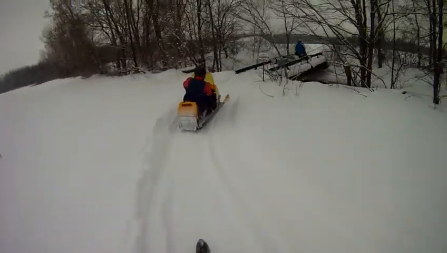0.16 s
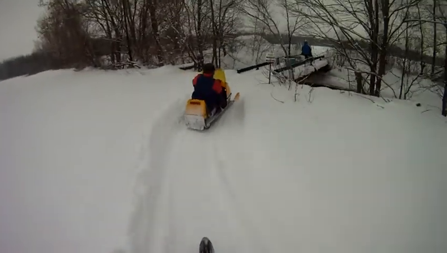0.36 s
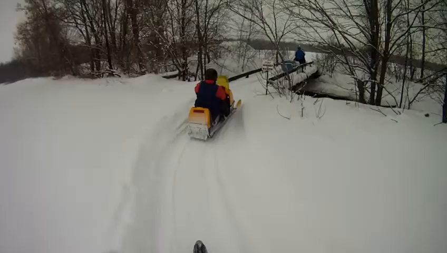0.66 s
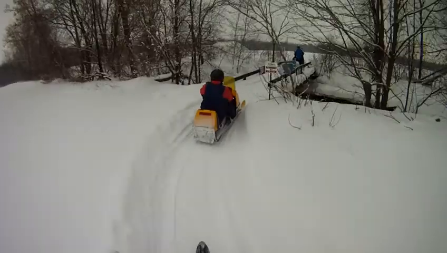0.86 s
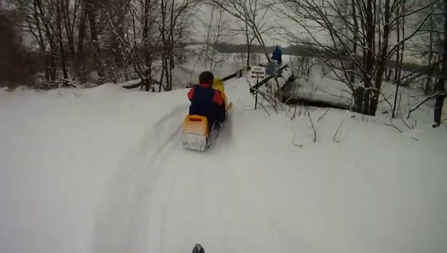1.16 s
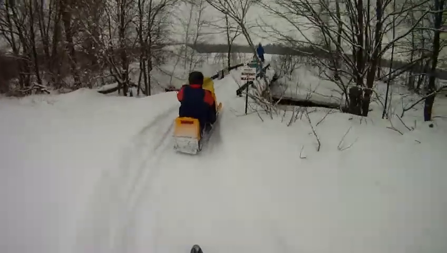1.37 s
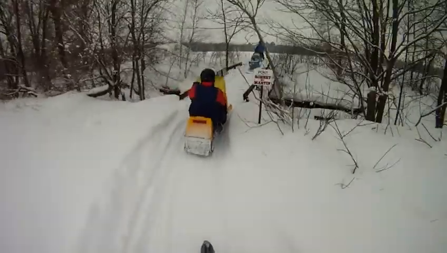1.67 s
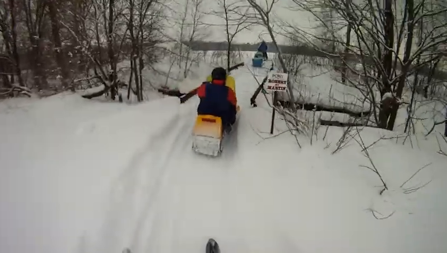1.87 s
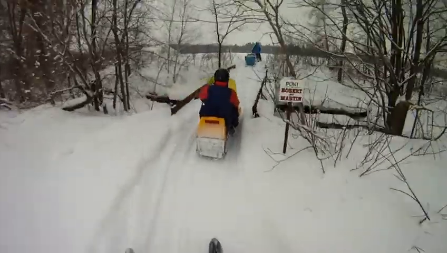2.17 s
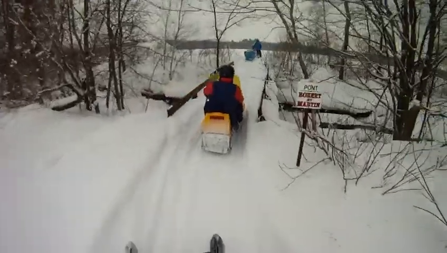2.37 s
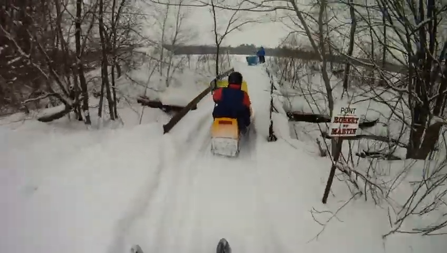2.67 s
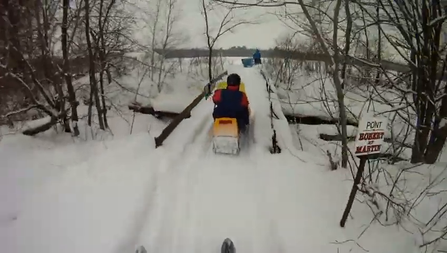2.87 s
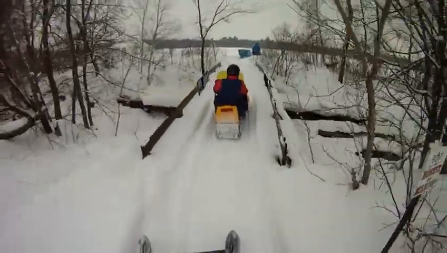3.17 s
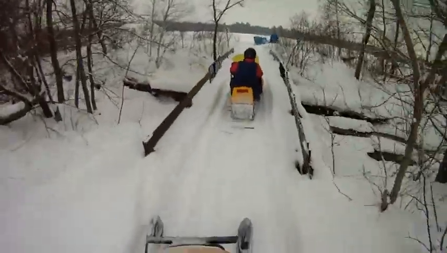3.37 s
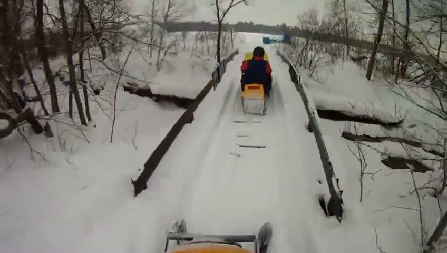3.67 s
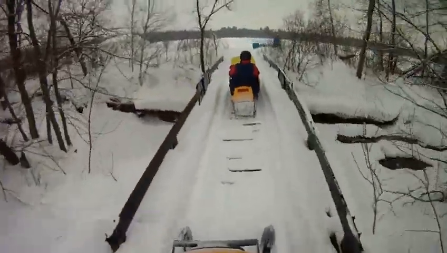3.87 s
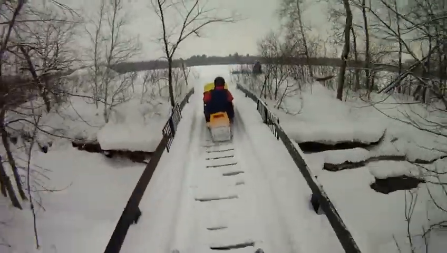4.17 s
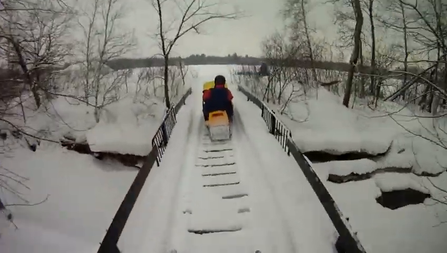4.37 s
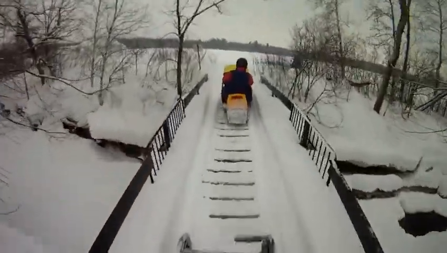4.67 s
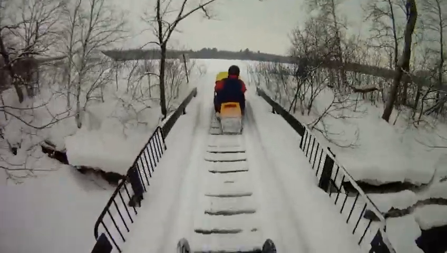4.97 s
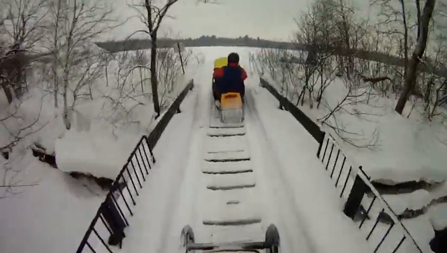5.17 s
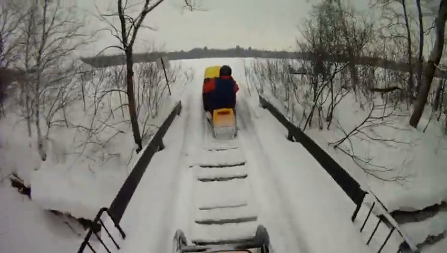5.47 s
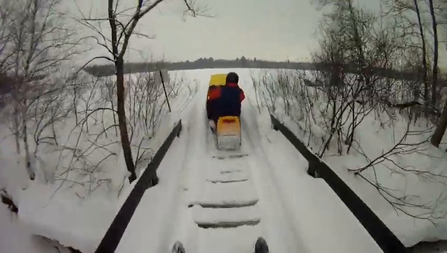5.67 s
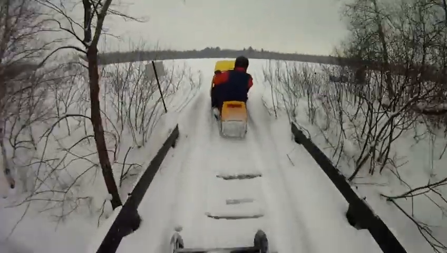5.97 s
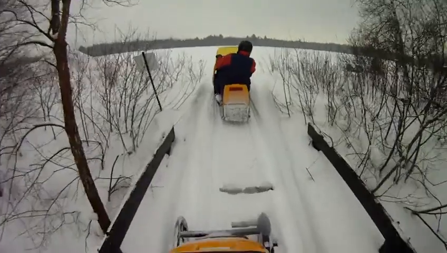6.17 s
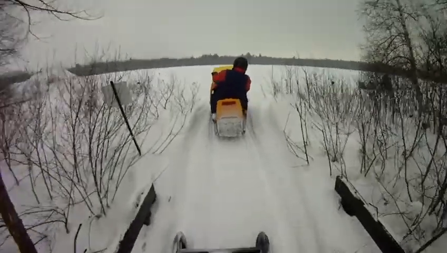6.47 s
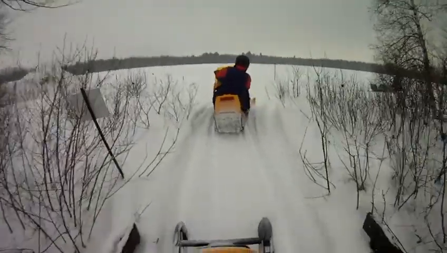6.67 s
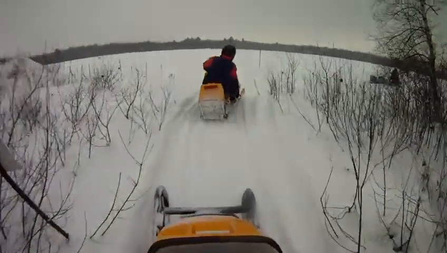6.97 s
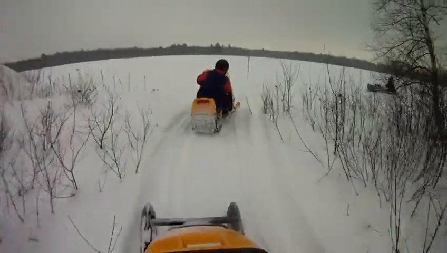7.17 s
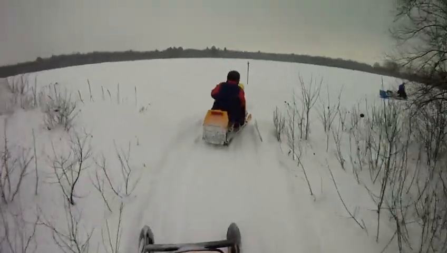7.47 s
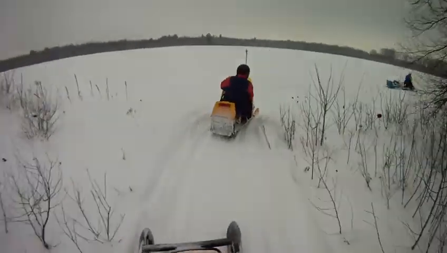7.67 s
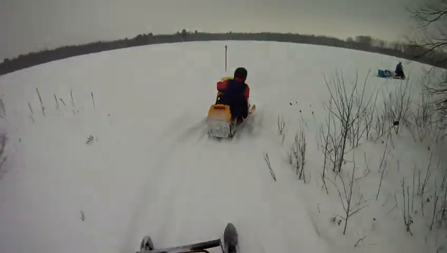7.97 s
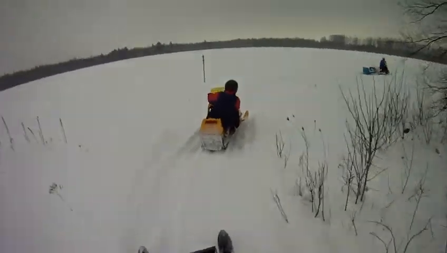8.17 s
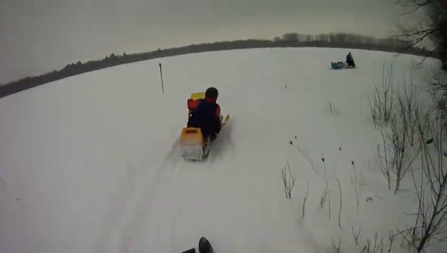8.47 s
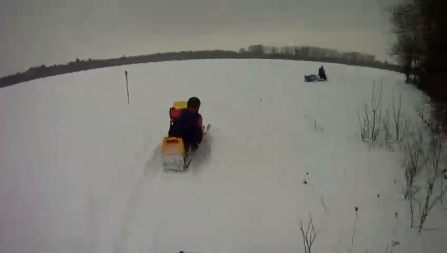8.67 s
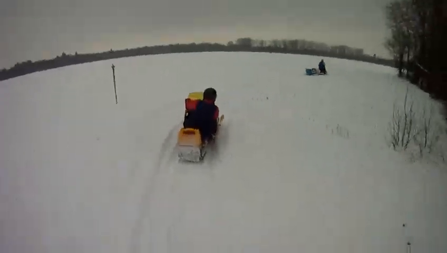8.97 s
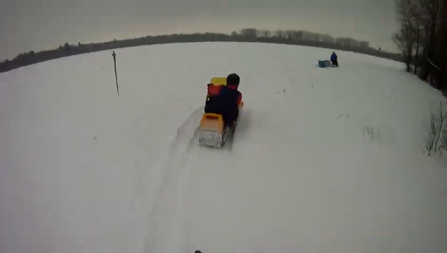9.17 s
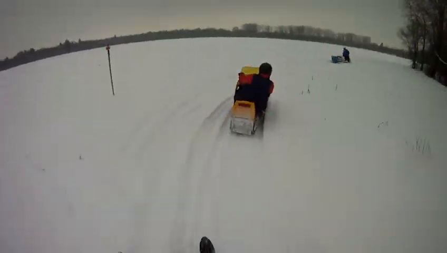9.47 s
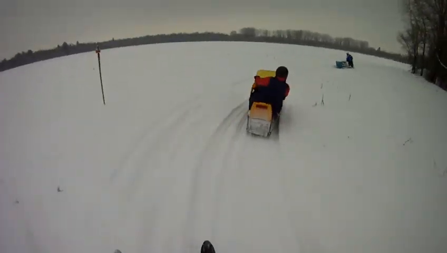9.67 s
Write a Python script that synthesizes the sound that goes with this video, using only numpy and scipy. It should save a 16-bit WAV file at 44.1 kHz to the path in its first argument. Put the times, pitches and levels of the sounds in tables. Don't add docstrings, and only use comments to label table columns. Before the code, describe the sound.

A sealed, dull-sounding microphone rides on a one-cylinder snowmobile. Low exhaust puffs skip and pop, each loud thump making the rest dip for a moment. Throttle bursts smooth the firing into a droning growl with a nasal intake ring. The engine falls back to sputtering near the end, revs and settles into regular popping, over track rattle and low rumble, nearly mono and gritty.

```python
import sys
import numpy as np
from scipy import signal
from scipy.fft import rfft, irfft
from scipy.io import wavfile
from scipy.ndimage import uniform_filter1d

SR = 44100
rng = np.random.default_rng(int(sys.argv[2]) if len(sys.argv) > 2 else 0)


def to_wav(s):
    ch = np.atleast_2d(s).T
    pcm = np.round(np.clip(ch, -1, 1) * 32767)
    wavfile.write(sys.argv[1], SR, pcm.astype(np.int16))


def invert_db(x):
    u = np.asarray(x, float) / 20
    return 10 ** u


N = 433052
START_HZ = 55
IN_STEP = .95

# (frequency [Hz], density [dB per Hz])
EXHAUST = [(12, -79), (20, -73), (40, -12.5), (80, -10), (113, -1.5), (176, -1), (237, -6), (368, -20.5),
           (471, -21), (520, -23.5), (698, -29), (822, -26), (952, -26), (1000, -30), (1300, -87),
           (2200, -120)]
# (frequency [Hz], density [dB per Hz])
COWL = [(560, -41), (950, -2.5), (1000, -3), (1120, 6.5), (1180, 7), (1390, 6), (1520, -3.5), (1660, -3),
        (1920, -10.5), (2240, -10.5), (2510, -22.5), (3340, -17.5), (4180, -32.5), (5100, -16),
        (6000, -21.5), (7800, -67), (13200, -120)]
# (frequency [Hz], width [Hz], level [dB])
AIR_BOX = [(587, 84, -11), (817, 108, -6.5), (1167.4, 57, 4), (1408, 69, -10), (1728, 13, -5.5),
           (2224, 11.4, -9)]


def in_time(rows):
    s, *columns = np.transpose(rows)
    return [np.interp(np.arange(N) / SR, s, c) for c in columns]


def rms_one(x):
    return x / np.sqrt(np.mean(x ** 2) + 1e-20)


def colour(x, spectrum, smear_s=0.):
    hz = np.maximum(np.fft.rfftfreq(N, 1 / SR), 1)
    corner_hz, db = np.transpose(spectrum)
    lag = np.exp(-1j * np.pi * smear_s * hz ** 2 / 1000)
    gain = invert_db(np.interp(np.log(hz), np.log(corner_hz), db))
    return rms_one(irfft(rfft(x) * lag * gain, N))


def band(x, low_hz, high_hz):
    return rms_one(signal.sosfilt(signal.butter(3, [low_hz, high_hz], "band", fs=SR, output="sos"), x))


def ring(x, modes):
    out = 0
    for k, (hz, width_hz, db) in enumerate(modes):
        r = np.exp(-np.pi * width_hz / SR)
        poles = [1, -2 * r * np.cos(2 * np.pi * hz / SR), r * r]
        zeros = np.array([1, 0, -1]) * (1 - r * r) / 2
        out = out + (-1) ** k * invert_db(db) * signal.lfilter(zeros, poles, x + 1e-18)
    return rms_one(out)


def drift(rate_hz):
    r = np.exp(-80 * np.pi * rate_hz / SR)
    slow = signal.lfilter([1], [1, -2 * r, r * r], rng.standard_normal(N // 40 + 2002))[2000:]
    return np.interp(np.arange(N) / 40, np.arange(len(slow)), rms_one(slow))


def clicks(at_s, sizes):
    out = np.zeros(N)
    np.add.at(out, np.clip(np.round(at_s * SR).astype(int), 0, N - 1), sizes)
    return out


def new_turns(turns):
    return np.flatnonzero(np.diff(np.floor(turns)))


def gated_hiss(turns, delay, sharp):
    gate = np.exp(-sharp * ((turns - delay) % 1))
    return rng.standard_normal(N) * uniform_filter1d(gate, size=60)


def engine_state():
    # (time [s], pull towards crank speed [Hz], load [0-1], every-second-turn steadiness [0-1])
    throttle = [(0, 44.9, .35, .3), (.24, 63.3, .4, .3), (.46, 44.6, .3, .4), (.72, 46.6, .28, .4),
                (1.2, 40.2, .26, .4), (1.97, 36.3, .45, .5), (2.38, 49.8, .3, .5), (2.6, 45.2, .3, .5),
                (2.87, 34.6, .3, .5), (3.03, 55.3, .3, .5), (3.22, 63.2, .9, .6), (3.7, 51.8, .9, .8),
                (3.92, 42.5, .4, .85), (4.21, 53.6, .4, 1), (4.72, 38.5, .3, .5), (4.85, 66.4, .5, .4),
                (4.97, 66.7, .9, .4), (5.27, 43, .25, .5), (5.8, 58.1, .35, .5), (5.97, 51, .58, .5),
                (6.54, 66.8, .95, .5), (6.95, 59, .95, .5), (8, 64, .95, .5), (8.4, 48.4, .27, .5),
                (8.9, 68.3, .88, .8), (9.24, 55.6, .55, .9), (9.33, 60.2, .4, 1), (9.66, 53.2, .47, .8)]
    flywheel_s, thumb_s = .4, .08
    s, *columns = np.transpose(throttle)
    move = np.searchsorted(s, np.arange(N) / SR, "right") - 1
    pull_hz, load, steady = [uniform_filter1d(c[move], size=int(thumb_s * SR)) for c in columns]
    r = np.exp(-1 / (flywheel_s * SR))
    return signal.lfilter([1 - r], [1, -r], pull_hz, zi=[START_HZ])[0], load, steady


def trail_roughness_db():
    # (time [s], level [dB])
    trail = [(0, 3), (.38, 4), (.5, 1.2), (1.2, 1.5), (1.6, -0.5), (2.3, -0.5), (3, .2), (3.6, -1.6),
             (4.1, 3), (5, 0.9), (5.5, 1.2), (6.4, 0), (6.7, 1.7), (7.9, -2.3), (8.6, 4.5), (9, -0.6),
             (9.46, 3.5), (9.82, 1.6)]
    return in_time(trail)[0]


def lead_sled():
    turns = np.cumsum(74 + 3.0 * drift(.4)) / SR
    at = new_turns(turns)
    luck = rng.standard_normal((1000, 2))[:len(at)]
    return colour(clicks(at / SR + 0.00055 * luck[:, 0], invert_db(1.0 * luck[:, 1])), EXHAUST)


def trail_rumble():
    return colour(rng.standard_normal(N) * invert_db(0.5 * drift(23)), EXHAUST)


def track_rattle(turns):
    loose = rng.standard_normal(N) * invert_db(0.91 * drift(19) + 1.6 * drift(30))
    return loose + 1.1 * gated_hiss(turns, 0.633, sharp=1.95)


def snow_spray(rattle, trail_db):
    return invert_db(-68 + 1.8 * trail_db) * band(rattle, 4370, 5680)


def panel_clatter(rattle, octaves, trail_db):
    level_db = -41.5 + 2 * octaves + trail_db
    return invert_db(level_db) * (band(colour(rattle, COWL), 1827, 4650) + invert_db(-10.5) * ring(rattle, AIR_BOX[4:]))


def chassis_shake(turns, octaves, load, trail_db):
    level_db = -29.5 - 18 * load + 0.77 * trail_db - 6.4 * octaves + 5.5 * np.minimum(drift(11.0), .4)
    return invert_db(level_db) * np.sqrt(2) * np.cos(2 * np.pi * turns)


def intake(turns, load):
    port = clicks(new_turns(turns - .3) / SR, 1)
    port = rms_one(port) * (.6 + .4 * load) * invert_db(1.0 * drift(20))
    gulp = band(colour(gated_hiss(turns, 0.27, sharp=1.2), COWL), 750, 2060)
    notch = signal.iirnotch(985, 4.0, fs=SR)
    rung = signal.lfilter(*notch, signal.lfilter(*notch, ring(port, AIR_BOX)))
    return rms_one(rung) + invert_db(-9) * gulp


def rich_firings(turns, load, steady):
    # (time [s], peak [dB], depth of the gain duck that follows [dB])
    big_pops = [(0.182, -3.1, 8.3), (0.395, -3.9, 5.2), (0.638, -4.6, 5.9), (0.898, -4.9, 5.6),
                (1.021, -3.4, 3.2), (1.234, -2.9, 4.4), (1.344, -2.0, 11.4), (1.546, -3.1, 6.4),
                (1.687, -2.3, 8), (1.855, -4.1, 6.6), (2.092, -4.9, 10.3), (2.594, -4.1, 6.3),
                (2.711, -3.7, 6.5), (3.03, -2.8, 4.9), (3.317, -3.8, 3.4), (4.269, -4.8, 5),
                (4.487, -4.1, 4.5), (4.64, -3.9, 6.5), (4.791, -3.1, 7.8), (4.869, -3.8, 1.4),
                (5.332, -1.1, 8), (5.553, -0.4, 12.6), (5.836, -1.0, 11.2), (6.275, -2.8, 4.2),
                (6.494, -4.0, 3.1), (8.448, -4.7, 6.5), (8.704, -4.0, 4), (8.882, -2.7, 5.7),
                (9.319, -3.3, 6.5), (9.674, -4.5, 2.9)]
    share, peak_db, rest_s, most_duck_db = .4, -5.8, .035, 3.
    s, db, pop_duck_db = np.transpose(big_pops)
    at = new_turns(turns)
    luck = rng.random((700, 2))[:len(at)]
    clear = np.abs(at[:, None] / SR - s).min(axis=1) > rest_s
    small = clear & (luck[:, 0] < share * (1 - load[at]) * (1 - steady[at]))
    small |= clear & (steady[at] >= IN_STEP) & (np.arange(len(at)) % 2 == 0)
    rich = luck[small, 1]
    pop_s = np.r_[s, at[small] / SR]
    pop_db = np.r_[db, peak_db + 1.6 * (rich - .5)]
    return pop_s, pop_db, np.r_[pop_duck_db, most_duck_db * rich ** 2]


def pops(s, db):
    u = np.pi * 165 * (np.arange(-700, 701) / SR)
    puff = (1 - 2 * u ** 2) * np.exp(-u ** 2) - .08 * np.exp(-(u / 3.0) ** 2)
    return signal.fftconvolve(clicks(s + .002, invert_db(db - .6)), puff, "same")


def hush(s):
    return np.clip(1 - 0.91 * np.convolve(clicks(s + 0.0015, 0.63), np.hanning(700), "same"), 0, 1)


def firings(turns, load, steady):
    at = new_turns(turns)
    luck = rng.standard_normal((700, 3))[:len(at)]
    lean = 1 - load[at]
    slips = np.cumsum(luck[:, 0] > 3.0 * steady[at] - .6)
    weak_turn = (np.arange(len(at)) + slips * (steady[at] < IN_STEP)) % 2
    scatter_db = (1.2 + 3.0 * lean) * np.clip(luck[:, 1], -2, 1.3)
    sizes = np.clip(1 - 1.3 * lean * weak_turn, .1, 1) * invert_db(scatter_db)
    jitter_s = (.0001 + 0.0028 * lean * (1.1 - steady[at])) * luck[:, 2]
    return clicks(at / SR + jitter_s, sizes)


def even_orders(turns, speed, load):
    # (multiple of crank speed [-], level [dB])
    orders = [(1, -6.5), (2, 3), (3, -4), (4, -4.5), (5, -12.5), (6, -16), (7, -14), (8, -17), (9, -54),
              (10, -15), (11, -57)]
    pull = np.clip(uniform_filter1d(np.gradient(speed) * SR, size=4000) / 22, 0, 1)
    lines = 0
    for (k, db), p in zip(orders, rng.random(len(orders))):
        line_db = db + 3.06 * drift(18.0) + 8.2 * pull * (4 < k < 10)
        lines = lines + invert_db(line_db) * np.cos(2 * np.pi * k * turns - .2 * k * (1 + p))
    return rms_one(lines) * load ** 2.5


def exhaust(turns, speed, load, steady, rumble):
    fired = colour(firings(turns, load, steady), EXHAUST, smear_s=.003)
    fired = fired * (1 - .5 * load ** 2) * invert_db(3.7 * (1 - load) * steady ** 4)
    out = invert_db(-6.0) * fired + invert_db(-9.5) * even_orders(turns, speed, load)
    out = out + invert_db(-7) * rumble * (1.05 - .65 * load) * (1 - .3 * steady ** 4)
    out = invert_db(-11) * (out + invert_db(-13) * lead_sled())
    out = .55 * np.tanh(out / .55)
    return signal.sosfiltfilt(signal.butter(3, 520, fs=SR, output="sos"), out)


def gain_control(s, depth_db):
    slow_share, slow_release_s, attack_s = 0.46, 0.072, .0015
    release_db = 125 * np.arange(N) / SR
    duck_db = np.maximum.accumulate(clicks(s + .006, .92 * depth_db) + release_db) - release_db
    lingering = clicks(s + 0.0081, slow_share * depth_db ** 2 / 12)
    slow_db = signal.lfilter([1], [1, -np.exp(-1 / (slow_release_s * SR))], lingering)
    r = np.exp(-1 / (attack_s * SR))
    return invert_db(-signal.lfilter([(1 - r) ** 2], [1, -2 * r, r * r], np.maximum(duck_db, slow_db)))


def scene():
    speed, load, steady = engine_state()
    trail_db = trail_roughness_db()
    octaves = np.log2(speed / START_HZ)
    turns = np.cumsum(speed) / SR
    pop_s, pop_db, pop_duck_db = rich_firings(turns, load, steady)
    rumble, rattle = trail_rumble(), track_rattle(turns)
    intake_db = -45 + 2.5 * octaves + 3 * load + 1.5 * drift(2.4) + 0.56 * trail_db
    mix = snow_spray(rattle, trail_db) + panel_clatter(rattle, octaves, trail_db)
    mix = mix + chassis_shake(turns, octaves, load, trail_db)
    mix = mix + invert_db(intake_db) * intake(turns, load)
    mix = mix + invert_db(intake_db - 8.5 - 7 * load) * band(rumble, 520, 930)
    mix = mix + exhaust(turns, speed, load, steady, rumble) * hush(pop_s) + pops(pop_s, pop_db)
    return np.tile(gain_control(pop_s, pop_duck_db) * mix, (2, 1))


def band_limit(x):
    return signal.sosfilt(signal.butter(12, 15690, fs=SR, output="sos"), x)


def record(dry):
    # (frequency [Hz], density [dB per Hz])
    mismatch = [(18, -38), (30, -9), (249, -7), (970, -18.5), (1210, -25.5), (4380, -33.5), (6000, -41),
                (7840, -37), (10000, -37), (13000, -71), (22000, -120)]
    hold_hz, cutoff_hz = 12000, 15350
    x = signal.sosfilt(signal.butter(8, hold_hz / 2, fs=SR, output="sos"), dry[0] * invert_db(0.92))
    x = signal.sosfilt(signal.butter(2, 36, "high", fs=SR, output="sos"), x)
    mirrored = x * (1 + 2 * np.cos(2 * np.pi * hold_hz * np.arange(N) / SR))
    hz = np.fft.rfftfreq(N, 1 / SR)
    held = irfft(rfft(mirrored) * np.sinc(hz / hold_hz) * (hz < cutoff_hz), N)
    side = colour(rng.standard_normal(N), mismatch) * invert_db(-58.5)
    return band_limit(np.clip([held + side, held - side], -1, 1))


dry = scene()
out = record(dry)
to_wav(out)
```